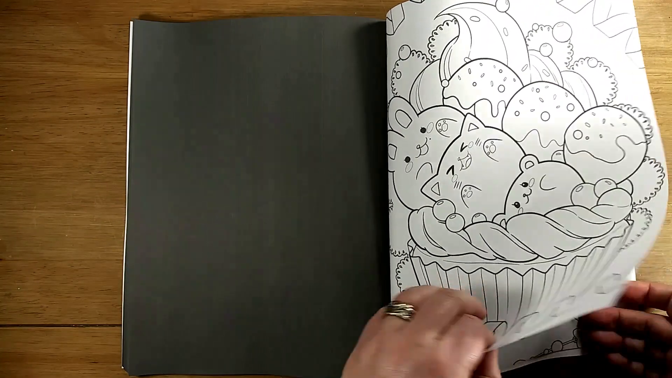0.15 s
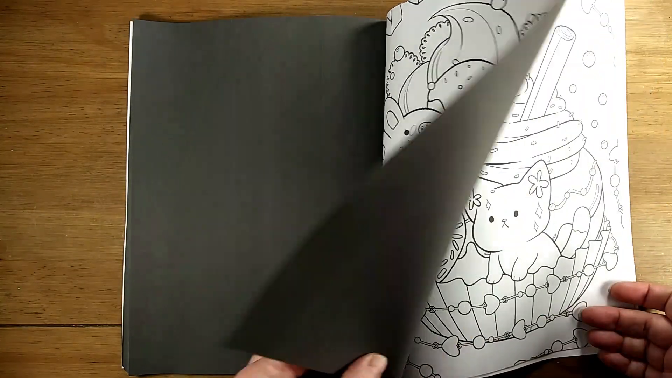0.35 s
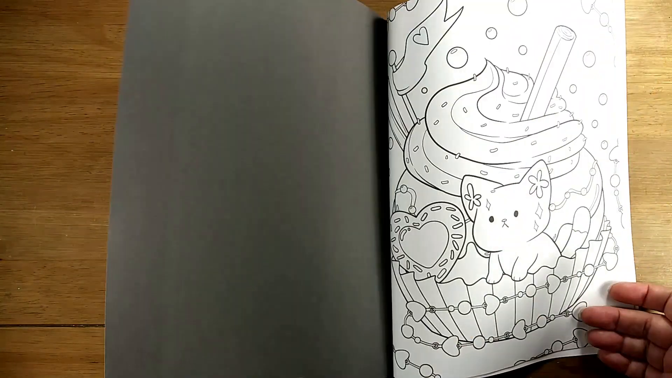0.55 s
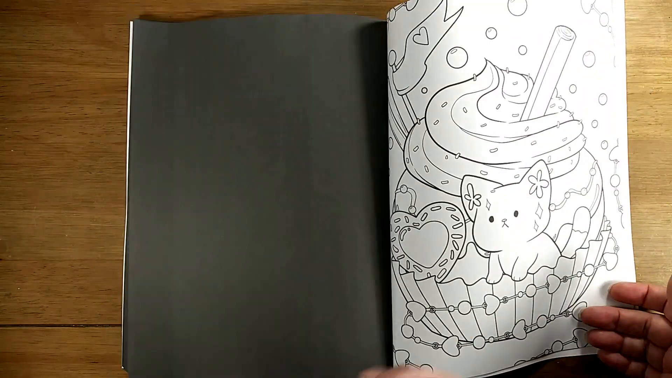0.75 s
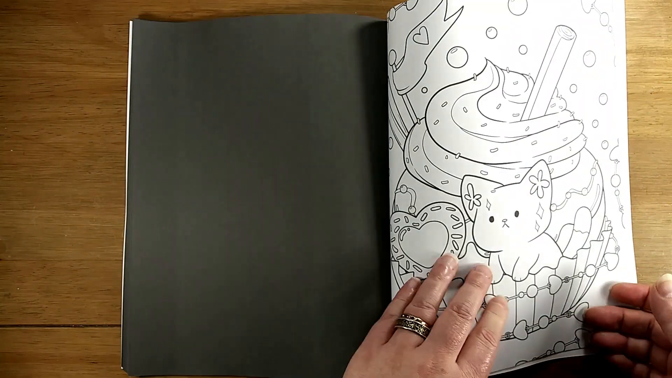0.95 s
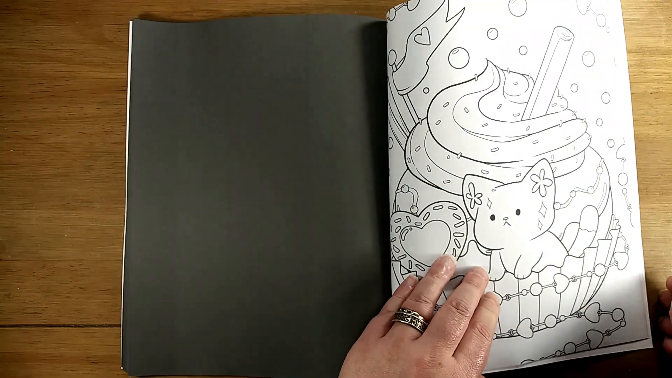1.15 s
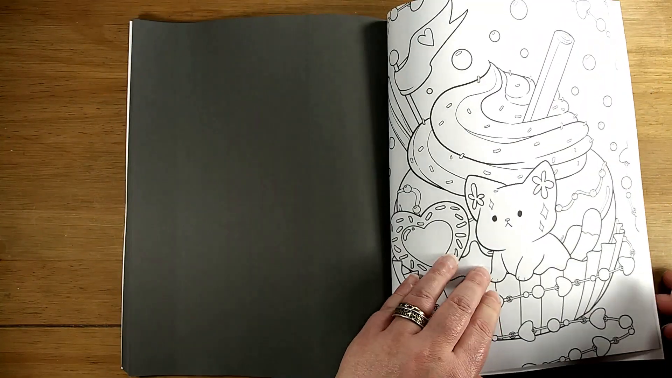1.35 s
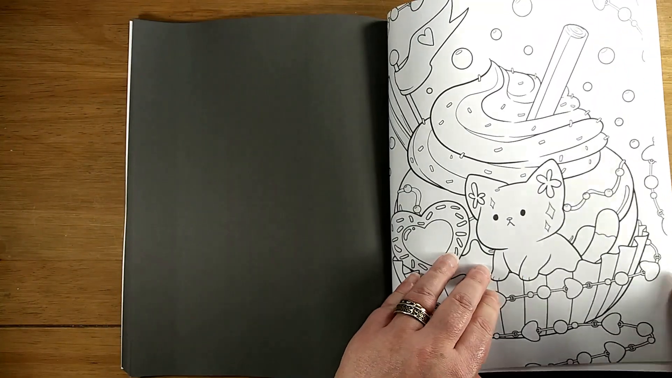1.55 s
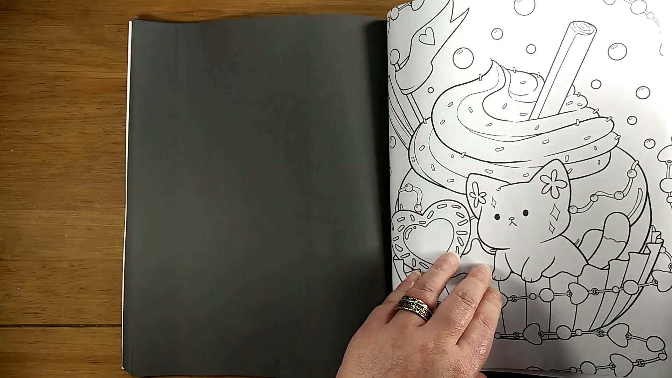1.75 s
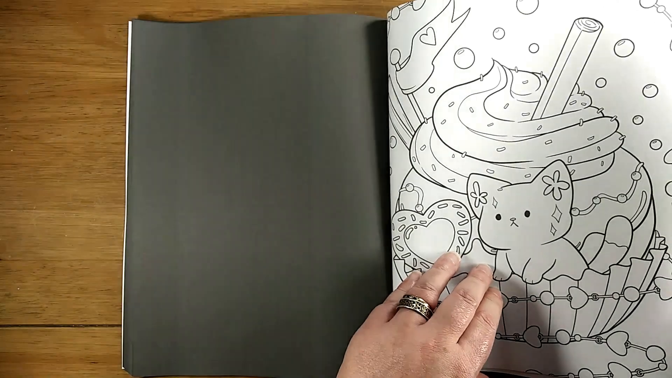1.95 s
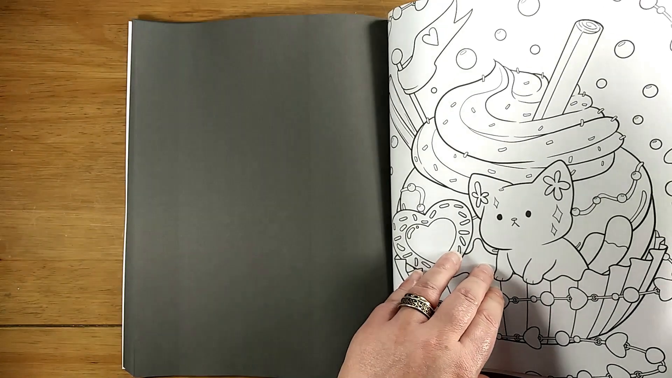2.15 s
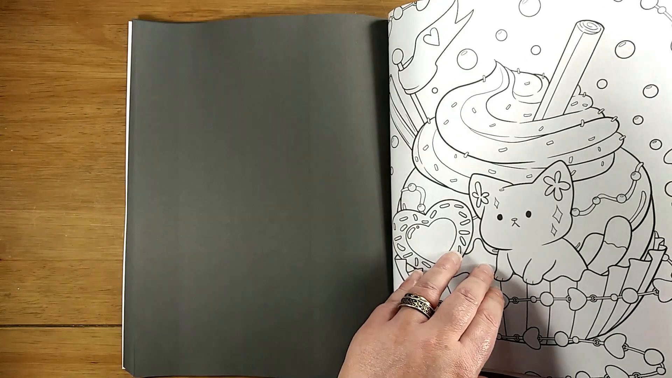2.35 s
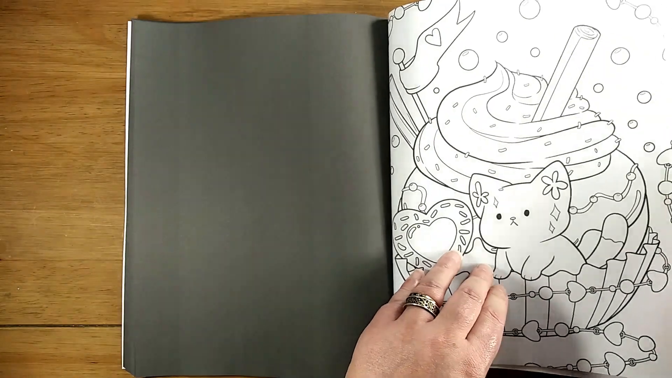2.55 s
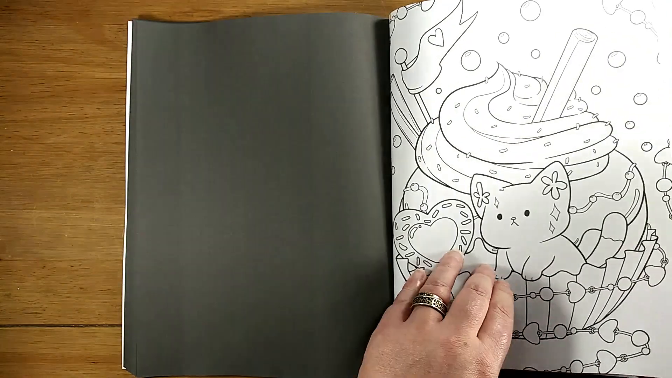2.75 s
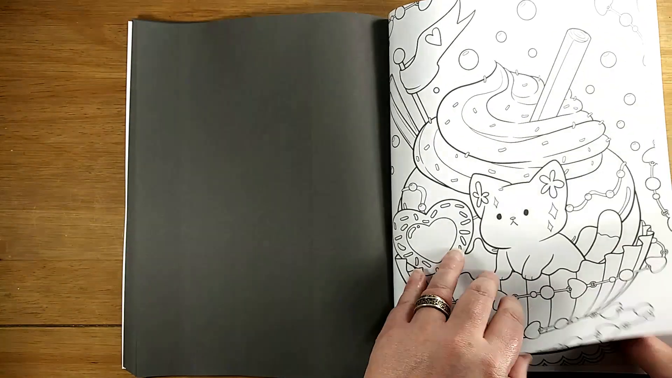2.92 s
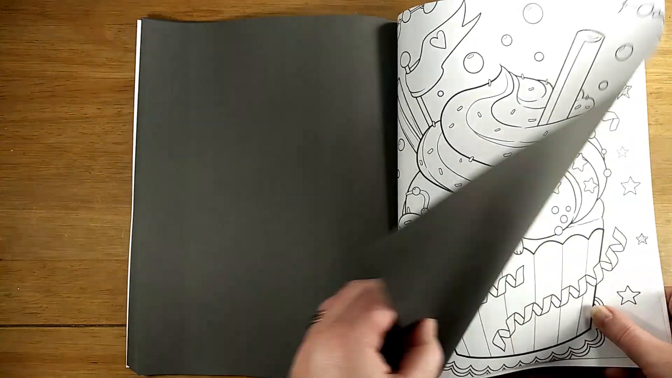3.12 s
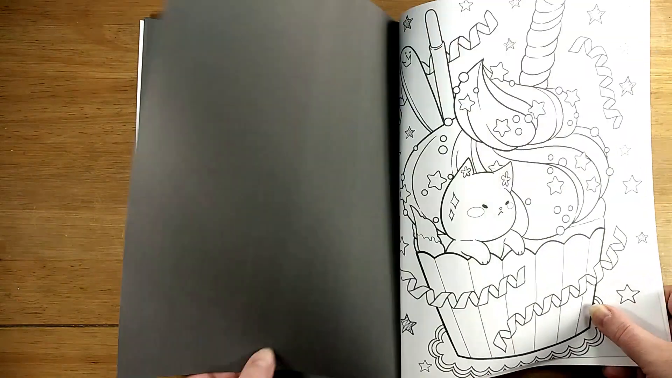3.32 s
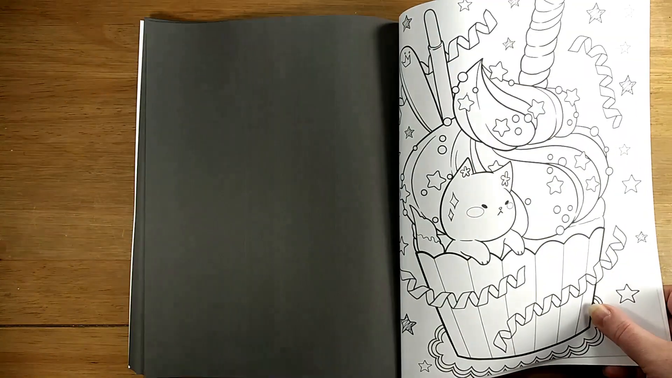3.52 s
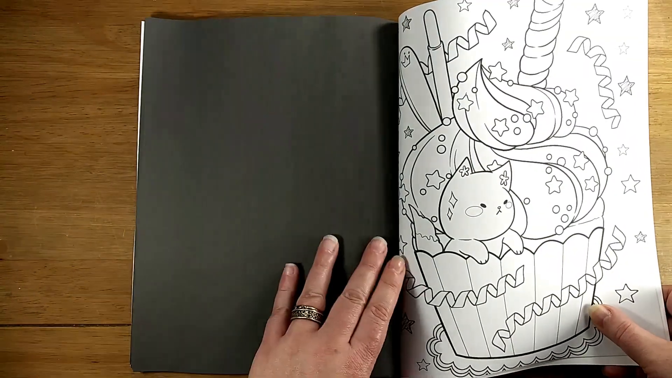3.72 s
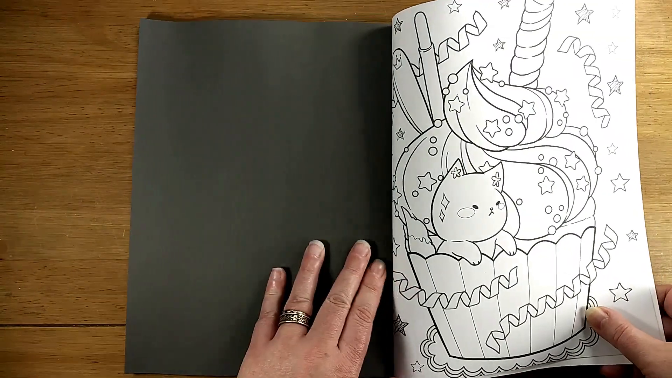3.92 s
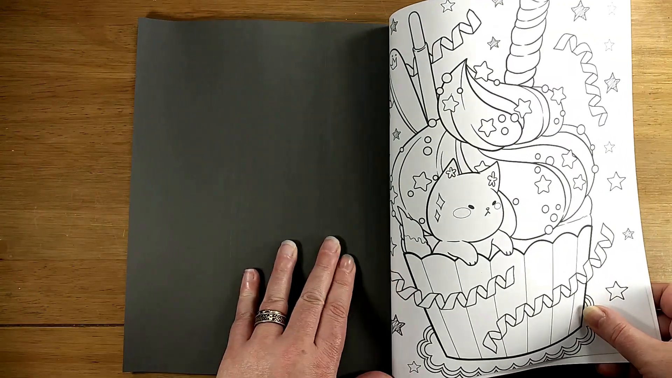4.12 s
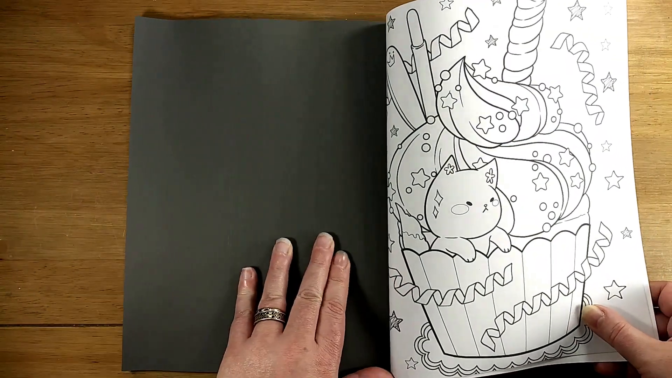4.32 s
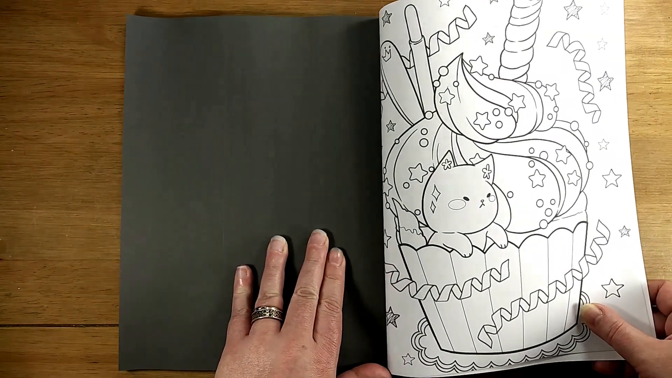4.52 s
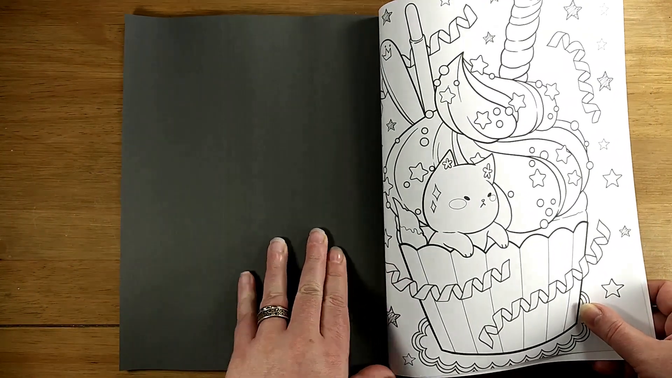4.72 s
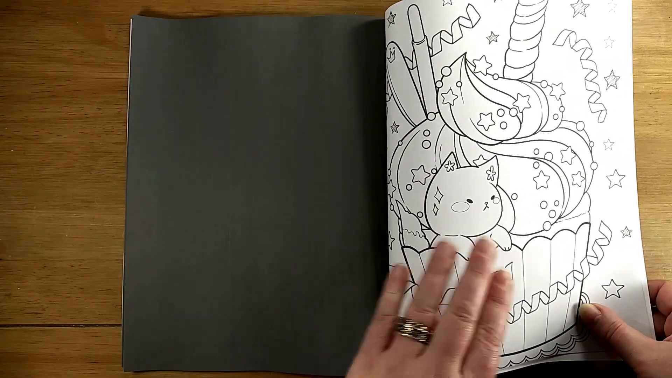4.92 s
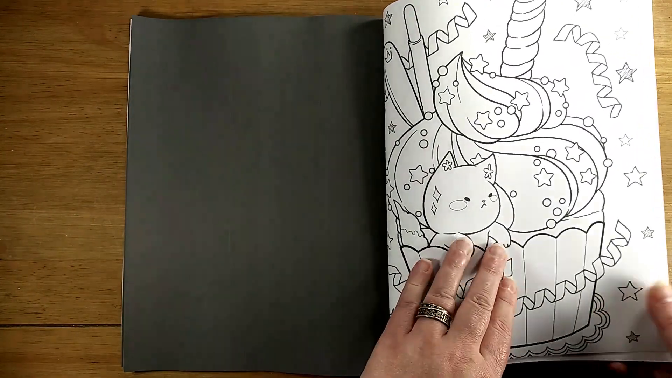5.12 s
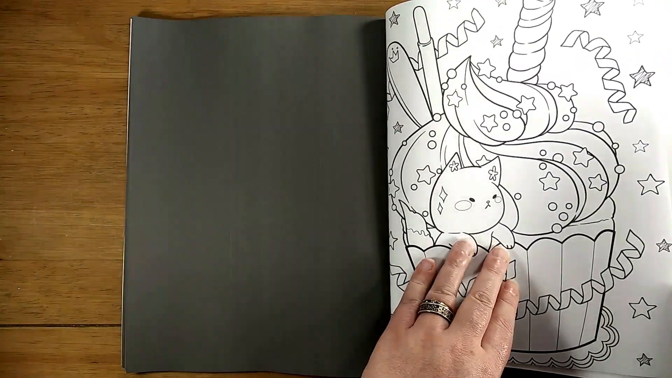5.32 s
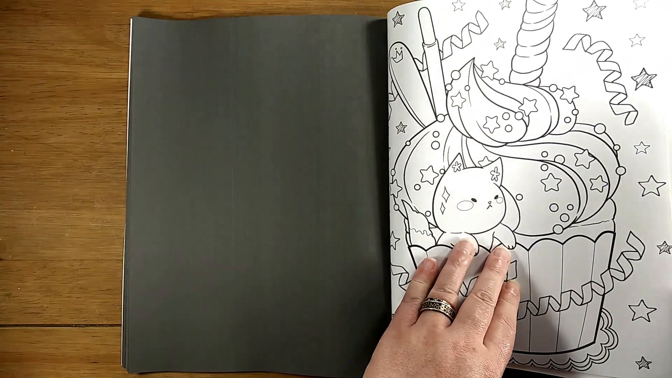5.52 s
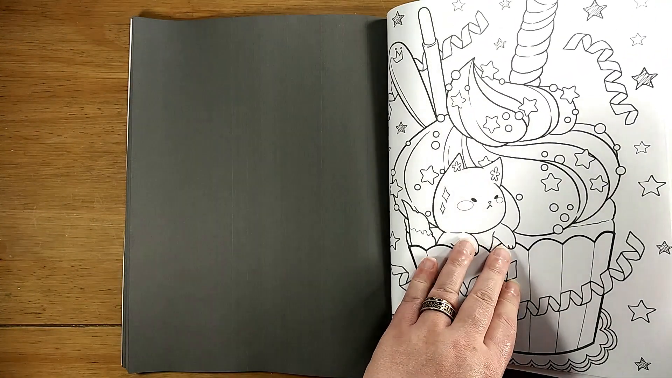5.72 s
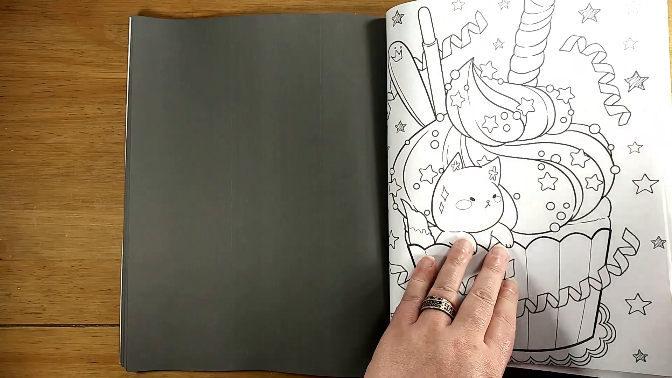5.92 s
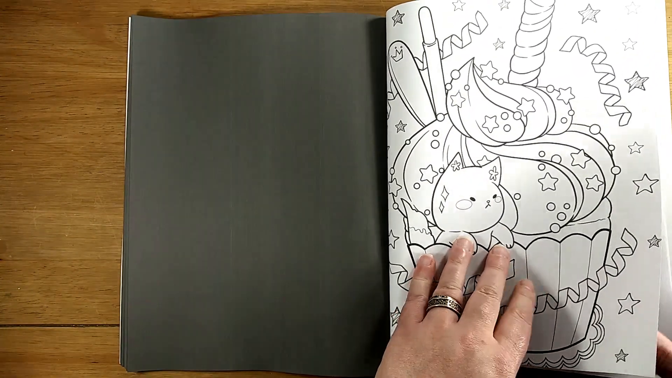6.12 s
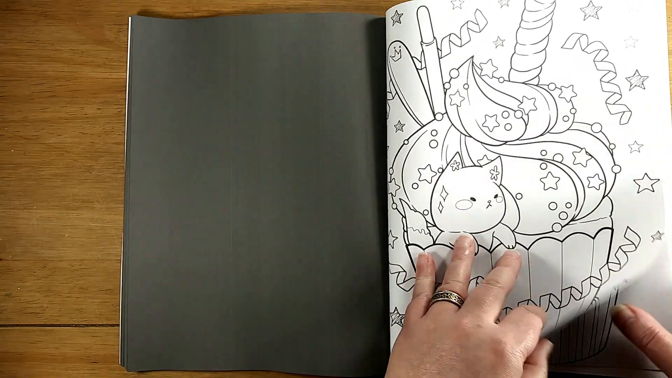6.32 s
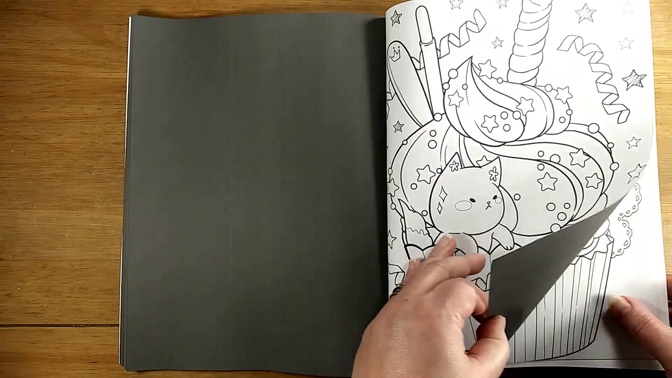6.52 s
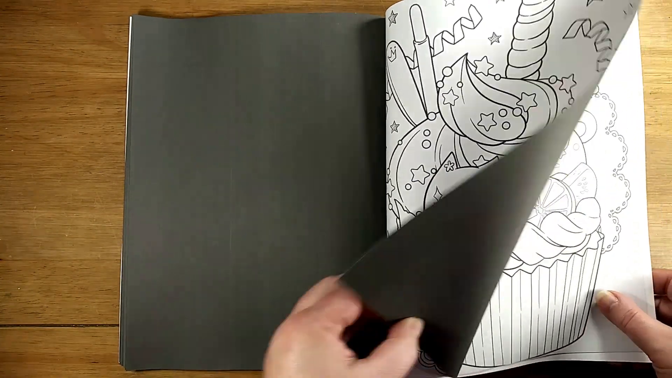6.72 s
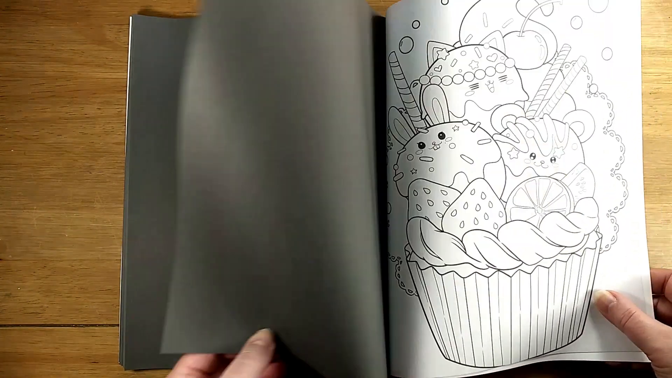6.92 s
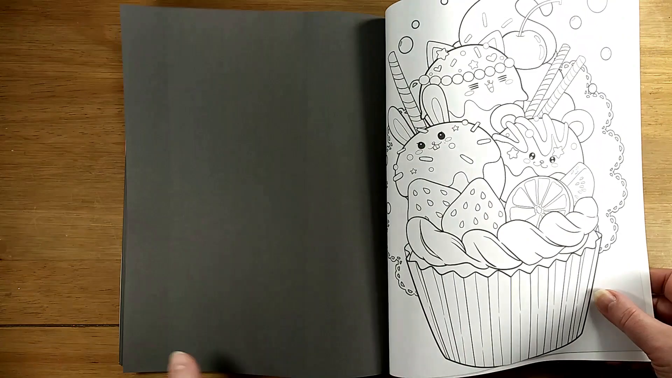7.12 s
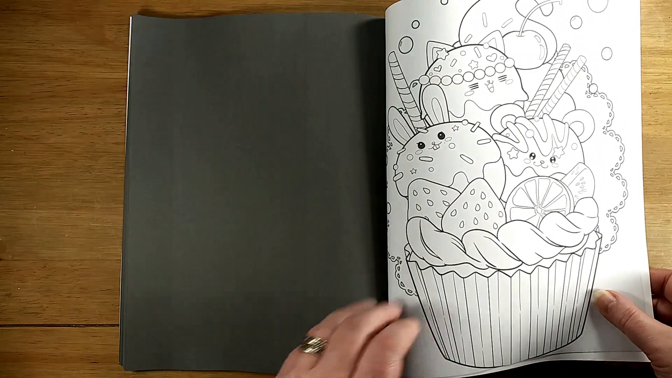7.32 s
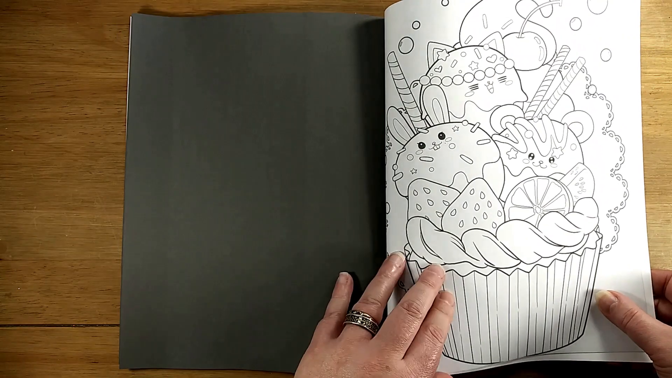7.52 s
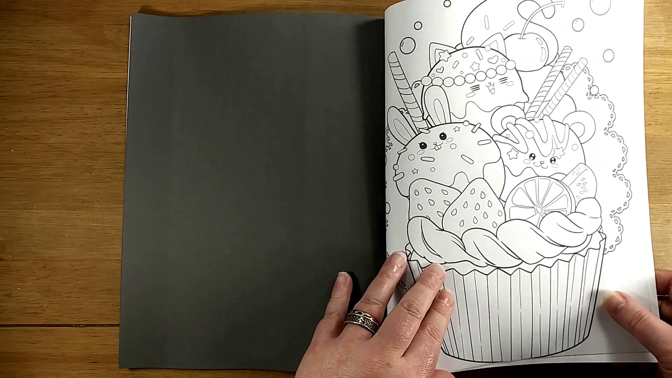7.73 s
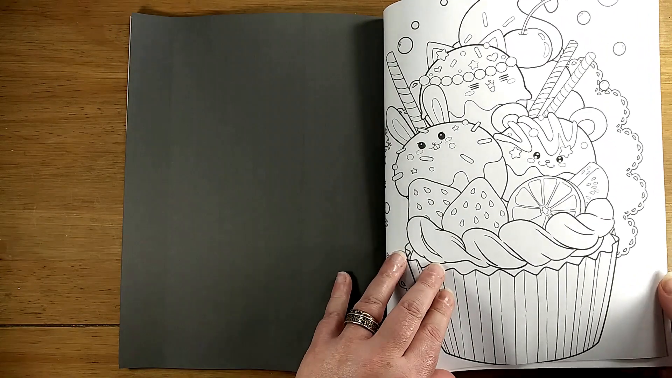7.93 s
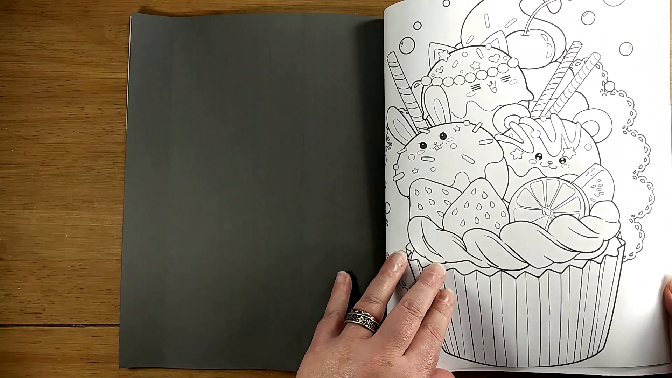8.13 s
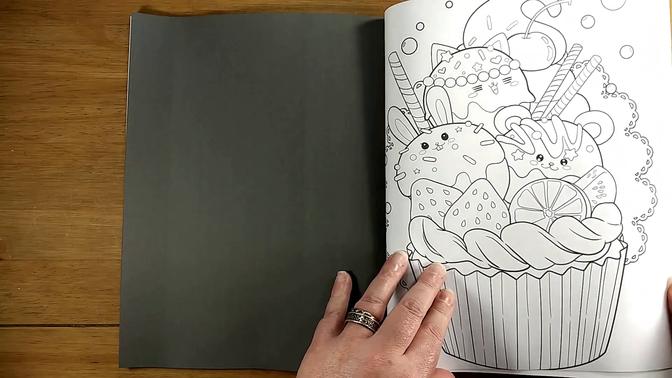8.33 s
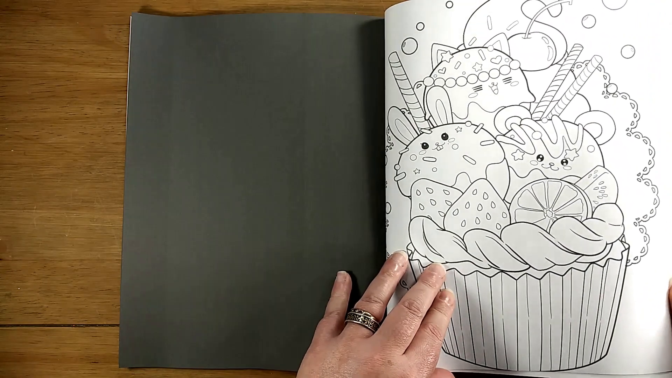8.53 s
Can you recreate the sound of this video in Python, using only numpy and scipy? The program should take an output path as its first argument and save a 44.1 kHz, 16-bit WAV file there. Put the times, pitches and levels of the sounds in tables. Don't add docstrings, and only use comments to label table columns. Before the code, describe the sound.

Close papery scrapes and flaps as a hand turns book pages on a table, sparse finger taps and crease clicks in a quiet room.

```python
import sys
import numpy as np
from scipy import signal
from scipy.fft import rfft, irfft, next_fast_len
from scipy.io import wavfile
from scipy.ndimage import uniform_filter1d

SR = 44100
rng = np.random.default_rng(int(sys.argv[2]) if len(sys.argv) > 2 else 0)


def volts(x):
    e = np.asarray(x, float) / 20
    return 10 ** e


def int16_out(signal):
    q = np.round(np.clip(np.atleast_2d(signal).T, -1, 1) * 32767)
    wavfile.write(sys.argv[1], SR, q.astype(np.int16))


N = 381906


def evened(x):
    return x / np.sqrt(np.mean(x ** 2) + 1e-20)


def colour(x, points):
    f, db = np.transpose(points)
    size = next_fast_len(len(x))
    hz = np.fft.rfftfreq(size, 1 / SR)
    gain = volts(np.interp(np.log(hz + 1), np.log(f + 1), db))
    return irfft(rfft(x, size) * gain, size)[:len(x)]


def resonate(x, hz, width):
    turn = np.exp(2j * np.pi * np.cumsum(hz * np.ones(len(x))) / SR)
    r = np.exp(-np.pi * width / SR)
    smooth = signal.lfilter([1 - r], [1, -r], x / turn + 1e-18)
    return 2 * (turn * smooth).real


def resonate_twice(x, hz, width, second_width):
    return resonate(resonate(x, hz, width), hz, second_width)


def swells(rows, weight=1):
    edge_db = -20
    rise_round, fall_round = 1.34, 1.46
    power = np.zeros(N)
    for (s, rise, fall, db, *_), w in zip(rows, weight * np.ones(len(rows))):
        start = max(round((s - 3 * rise) * SR), 0)
        stop = min(round((s + 3 * fall) * SR), N)
        at = np.arange(start, stop)
        late = at / SR - s
        bend = np.where(late < 0, abs(late / rise) ** rise_round, abs(late / fall) ** fall_round)
        power[at] += w * volts(2 * (db + edge_db * bend))
    return power


def slips(per_s, spread_db, clump_db, clump_s):
    size = volts(spread_db * np.minimum(rng.exponential(1, N), 5)) * rng.standard_normal(N)
    clump = evened(uniform_filter1d(rng.standard_normal(N), max(int(clump_s * SR), 2)))
    happens = rng.random(N) < per_s / SR
    return evened(size * happens * volts(clump_db * clump))


def patchy(x, depth_db, frames, bins):
    z = signal.stft(x, nperseg=256, noverlap=192)[2]
    field = uniform_filter1d(uniform_filter1d(rng.standard_normal(z.shape), bins, 0), frames, 1)
    return evened(signal.istft(z * volts(depth_db * evened(field)), nperseg=256, noverlap=192)[1][:N])


def paper():
    # (frequency [Hz], level [dB per Hz])
    scrape_spectrum = [(600, -38), (1200, -18), (2000, -0.5), (3200, -0.5), (5000, 3.5), (6500, -8),
                       (7800, -25), (9500, -18), (16000, -62)]
    # (frequency [Hz], level [dB per Hz])
    fizz_spectrum = [(4120, -7.5), (7000, -4.5), (7770, -11.5), (8760, -8.5), (10700, -6.5), (15100, -16),
                     (16000, -35)]
    (scrape, flex, fizz), gap_hz = movements()
    fine = patchy(slips(per_s=14000, spread_db=1.2, clump_db=1.0, clump_s=.006), 1.7, 24, 3)
    coarse = slips(per_s=6000, spread_db=1.7, clump_db=1.5, clump_s=.008)
    surface = evened(colour(fine, scrape_spectrum))
    gap = evened(resonate_twice(fine, gap_hz, 1950, 2500))
    rub = evened(0.73 * surface + 0.6 * gap)
    brush = evened(colour(fine, fizz_spectrum))
    return scrape * rub + flex * lifted_sheet(coarse) + fizz * brush + pockets(fine)


def movements():
    # (peak time [s], rise [s], fall [s], level [dB], pitch of the air gap under the sheet [Hz])
    first_page = [(0, .01, .03, -54, 2600), (.128, 0.092, 0.049, -47, 2450), (.2, 0.057, 0.11, -50, 2830),
                  (.25, 0.076, 0.13, -47, 3200), (.32, 0.15, 0.12, -46.5, 2770),
                  (.39, 0.09, 0.2, -43, 2980), (.44, 0.11, .1, -46, 3600), (.49, 0.12, 0.071, -44.5, 4530),
                  (.54, 0.17, 0.041, -43.5, 4700), (.6, 0.026, 0.044, -60.5, 2200),
                  (.81, 0.04, 0.3, -65, 3370), (1.044, 0.042, 0.096, -51, 4400),
                  (1.576, 0.16, 0.017, -60, 3800), (1.65, 0.039, 0.1, -60, 4300),
                  (1.706, 0.073, 0.017, -55.5, 4340)]
    # (peak time [s], rise [s], fall [s], level [dB], gap pitch [Hz])
    second_page = [(2.582, 0.033, 0.069, -45.5, 4260), (2.61, .04, .03, -50, 4300),
                   (2.66, 0.038, .025, -43.5, 4460), (2.702, 0.038, 0.067, -39.5, 4170),
                   (2.735, .04, 0.039, -43, 4270), (2.78, 0.3, 0.11, -42.5, 3180),
                   (2.839, 0.061, 0.033, -41, 3140), (2.862, 0.054, 0.046, -40.5, 2930),
                   (2.885, .04, 0.032, -38.5, 3150), (2.905, .04, 0.02, -37.5, 3140),
                   (2.94, 0.014, 0.092, -43.5, 3040), (3.04, .1, 0.09, -53.5, 3200),
                   (3.125, 0.056, 0.016, -41, 3650), (3.19, 0.057, 0.042, -51.5, 3700),
                   (3.26, 0.17, 0.091, -60, 3730), (3.335, 0.003, 0.043, -31, 3400),
                   (3.352, 0.032, 0.032, -36, 4300), (3.39, 0.077, 0.022, -41.5, 4500),
                   (3.614, 0.016, 0.051, -58, 4270), (3.715, 0.0045, 0.023, -48, 4600),
                   (3.737, 0.016, 0.041, -40, 5020), (3.815, 0.026, 0.044, -50, 5250),
                   (3.843, .05, 0.015, -55, 5020), (3.98, 0.033, .03, -58, 4000),
                   (4.02, 0.02, 0.35, -55.5, 3740), (4.135, 0.2, 0.012, -52.5, 3280),
                   (4.362, 0.09, 0.24, -71.5, 3420)]
    # (peak time [s], rise [s], fall [s], level [dB], gap pitch [Hz])
    fumbles = [(4.71, 0.037, 0.24, -69, 3500), (5.075, 0.031, .04, -60, 4540),
               (5.113, 0.019, 0.011, -56.5, 4930), (5.2, 0.14, 0.083, -59.5, 4600),
               (5.4, 0.42, 0.2, -70, 3270)]
    # (peak time [s], rise [s], fall [s], level [dB], gap pitch [Hz])
    third_page = [(5.918, 0.016, 0.19, -51.5, 4340), (5.98, 0.14, 0.056, -52.5, 4500),
                  (6.043, 0.025, 0.056, -41, 3880), (6.06, .03, .07, -43.5, 4480),
                  (6.08, .05, .05, -57, 4170), (6.12, 0.067, 0.044, -45, 3500),
                  (6.175, 0.17, 0.057, -46.5, 4100), (6.24, 0.11, .1, -56.5, 4180),
                  (6.319, 0.044, 0.0062, -34, 3160), (6.346, 0.02, 0.028, -38, 4300),
                  (6.4, .05, .08, -60, 4100), (6.452, 0.03, 0.023, -42.5, 4030),
                  (6.507, 0.008, 0.079, -43.5, 4020), (6.565, 0.11, 0.033, -43.5, 4030),
                  (6.64, 0.038, .06, -40, 3720), (6.695, 0.055, 0.033, -35.5, 4320),
                  (6.773, 0.014, 0.019, -42.5, 3440), (6.808, 0.067, 0.025, -47, 3380),
                  (6.914, 0.075, 0.14, -50, 3940), (6.95, 0.056, 0.11, -47.5, 4150),
                  (7.03, 0.11, 0.13, -46, 3970), (7.1, 0.1, 0.02, -41, 4360),
                  (7.458, 0.0054, 0.14, -59, 4570), (7.8, .06, 0.11, -72, 3140),
                  (7.924, 0.022, 0.18, -68, 3800), (8.172, .022, 0.045, -56, 4160)]
    # (peak time [s], rise [s], fall [s], level [dB])
    brushes = [(.135, 0.2, 0.1, -56.5), (.236, 0.091, 0.15, -54), (.41, 0.092, .1, -61),
               (.5, 0.17, 0.061, -46), (.546, 0.088, 0.032, -45), (.8, 0.018, 0.017, -62.5),
               (1.0, 0.016, 0.045, -56), (1.045, 0.025, 0.068, -51.5), (1.1, 0.069, .045, -53),
               (2.586, 0.025, 0.11, -49.5), (2.69, .1, .07, -58), (2.9, 0.021, 0.025, -45),
               (2.94, 0.013, 0.083, -48.5), (3.11, 0.11, 0.051, -50), (3.19, 0.04, 0.037, -52.5),
               (3.26, 0.069, 0.065, -59.5), (3.336, .004, 0.068, -35.5), (3.742, 0.024, 0.0095, -40),
               (3.834, 0.068, 0.017, -59), (3.928, 0.026, 0.017, -60), (3.98, 0.046, 0.054, -58),
               (4.03, 0.044, 0.096, -48.5), (4.135, 0.3, 0.011, -54), (4.362, 0.055, .04, -64),
               (4.78, 0.13, 0.1, -63), (5.068, 0.0094, 0.02, -50.5), (5.113, .02, 0.022, -60),
                     (5.2, 0.028, 0.033, -65), (6.044, 0.021, 0.07, -58), (6.318, 0.017, 0.0079, -52),
                     (6.346, .012, 0.033, -51.5), (6.453, 0.083, .025, -53.5), (6.515, 0.017, 0.065, -46),
                     (6.56, 0.088, 0.057, -47.5), (6.693, 0.09, 0.031, -40.5), (6.947, 0.04, 0.042, -44.5),
                     (7.032, 0.066, 0.086, -43.5), (7.46, 0.0091, 0.13, -65), (7.796, .03, 0.043, -59)]
    # (peak time [s], rise [s], fall [s], level [dB])
    bends = [(0, .01, 0.021, -36.5), (.075, 0.043, 0.045, -53), (.131, .006, 0.026, -46),
             (.236, 0.11, 0.17, -51.5), (.344, 0.18, 0.079, -50.5), (.546, 0.026, .05, -47),
             (.58, 0.013, 0.034, -39.5), (.605, 0.02, 0.072, -43.5), (.64, .05, 0.094, -63),
             (1.05, 0.037, 0.13, -53.5), (1.44, .01, 0.048, -60.5), (2.522, .008, 0.044, -51.5),
             (2.57, 0.032, 0.21, -51), (2.706, 0.0041, 0.031, -42), (2.68, 0.057, 0.03, -54),
             (2.86, 0.21, 0.043, -49.5), (2.925, 0.015, 0.049, -45.5), (3.06, 0.089, .1, -55),
             (3.125, 0.087, 0.018, -39.5), (3.19, .06, 0.18, -56.5), (3.334, 0.00067, 0.029, -28.5),
             (3.35, 0.03, 0.073, -38), (3.41, .05, 0.025, -52), (3.724, 0.007, 0.036, -36.5),
             (3.835, .14, 0.027, -49), (3.928, 0.031, 0.032, -50.5), (3.975, .012, 0.036, -63),
             (4.008, 0.0048, .2, -45.5), (4.125, 0.22, 0.031, -47.5), (4.28, .2, 0.019, -60.5),
             (4.41, 0.22, 0.038, -63),
             (4.52, 0.03, .04, -62), (4.796, 0.048, 0.11, -64), (4.88, 0.066, .06, -61.5),
                   (5.069, 0.0064, 0.027, -48), (5.205, 0.073, 0.04, -56.5), (5.924, 0.054, 0.18, -55),
                   (6.043, 0.023, .05, -45.5), (6.1, 0.054, 0.19, -55), (6.329, 0.086, 0.012, -48),
                   (6.52, 0.072, 0.14, -38.5), (6.562, 0.086, 0.023, -34.5), (6.645, 0.044, 0.066, -34),
                   (6.7, 0.13, 0.021, -31.5), (6.769, 0.0066, 0.044, -41.5), (6.9, 0.076, 0.21, -53),
                   (7.1, .3, .05, -57), (7.5, 0.047, 0.0078, -55.5), (7.518, 0.004, 0.0059, -41.5),
                   (7.924, 0.027, 0.092, -67), (8.172, 0.026, 0.062, -66)]
    slides = first_page + second_page + fumbles + third_page
    rest_hz, rest = 3500, 1e-11
    scrape = swells(slides)
    hz = (swells(slides, np.transpose(slides)[-1]) + rest * rest_hz) / (scrape + rest)
    octaves = np.log2(hz / rest_hz)
    flex = swells(bends) + scrape * volts(2 * (-26.5 - 39 * octaves))
    fizz = swells(brushes) + scrape * volts(2 * (-26.5 + 45.5 * octaves))
    return np.sqrt([scrape, flex, fizz]), uniform_filter1d(hz, size=400)


def lifted_sheet(coarse):
    # (frequency [Hz], width [Hz], level [dB])
    sheet_modes = [(630, 123, -11), (772, 15, 15.5), (840, 390, -1), (1178, 9.7, 20), (1640, 160, 14)]
    # (time [s], pitch [Hz])
    curl_curves = [
        [(0.0, 1600), (0.128, 1240), (0.27, 1500), (0.498, 1440), (0.556, 980), (0.7, 664)],
        [(0.95, 643), (1.074, 830), (1.322, 643), (1.412, 1240), (1.572, 1140), (1.6, 774)],
        [(2.5, 932), (2.752, 786), (2.83, 1380), (3.018, 740), (3.196, 1460), (3.25, 896)],
        [(3.3, 864), (3.424, 990), (3.53, 587), (3.658, 782), (3.68, 1200), (4.3, 915)],
        [(4.7, 1170), (4.782, 662), (4.836, 1300), (4.884, 521), (5.174, 912), (5.3, 629)],
        [(5.9, 1220), (6.202, 1030), (6.242, 873), (6.294, 1380), (6.334, 1280), (6.44, 1380)],
        [(6.45, 850), (6.632, 1060), (6.662, 970), (6.732, 1390), (6.756, 1030), (6.85, 1050)],
        [(6.87, 1420), (6.926, 1300), (7.122, 1500), (7.154, 746), (7.574, 630), (7.6, 673)],
    ]
    modes = np.zeros(N)
    for k, (hz, width, db) in enumerate(sheet_modes):
        modes += (-1) ** k * volts(db) * resonate(coarse, hz, width)
    rumble = colour(coarse, [(150, -27), (350, -5.5), (600, -2.5), (1000, 0), (1600, -1.5),
                             (3000, -20), (6000, -69)])
    curl_hz = np.interp(np.arange(N) / SR, *np.concatenate(curl_curves).T)
    curl = resonate_twice(coarse, curl_hz, 980, 1340)
    return evened(0.25 * evened(modes) + 0.7 * evened(rumble) + 0.78 * evened(curl))


def pockets(slipping):
    # (peak time [s], rise [s], fall [s], level [dB], pitch [Hz])
    pocket_events = [(.1, .07, .05, -58, 4800), (.235, .05, .06, -55, 5370), (.33, 0.083, 0.037, -56, 2100),
                     (.39, 0.054, .05, -54, 3100), (.52, .08, 0.038, -55, 5140),
                     (2.84, 0.047, .03, -44, 3300), (2.875, .04, 0.031, -34, 2980),
                     (3.345, 0.011, 0.022, -36.5, 2300), (3.728, 0.0065, .02, -39.5, 2030),
                     (3.739, .015, .015, -47, 4950), (4.835, .008, 0.0099, -51, 1650),
                     (5.212, .002, 0.0072, -46, 4500), (6.31, 0.023, .015, -49, 2400),
                     (6.515, 0.013, .04, -46, 3870), (6.69, .04, 0.028, -40, 2970),
                     (6.948, 0.027, .035, -47, 10500), (6.97, .06, 0.066, -52, 4070),
                     (7.075, .06, .04, -55, 4570), (7.81, .02, .03, -64, 4500)]
    sharpness = 3.4
    out = np.zeros(N)
    for row in pocket_events:
        s, hz = row[0], row[-1]
        near = slice(max(round((s - .3) * SR), 0), round((s + .3) * SR))
        band = resonate_twice(slipping[near], hz, hz / sharpness, hz / sharpness)
        out[near] += np.sqrt(swells([row])[near]) * evened(band)
    return out


def snaps():
    # (time [s], crack level [dB], thud against crack [dB], thud pitch [Hz], decay time T60 [s])
    buckles = [(0.0014, -32.5, -14, 1225, 0.062), (0.1296, -35.5, 0.5, 1340, 0.028),
               (0.5792, -51.5, 22.5, 850, 0.013), (0.6027, -53.5, 19, 900, 0.024),
               (1.2544, -25, -4, 640, 0.0075), (1.4331, -22.5, -17, 1330, 0.013),
               (1.436, -43, 15.5, 1260, 0.0096), (1.4399, -50.5, 13, 780, .01),
               (1.4456, -51, 12, 720, .008), (2.7001, -46, 26.5, 713, 0.016), (2.7113, -54, 11, 620, 0.012),
               (3.0285, -48.5, 18.5, 784, 0.023), (3.0865, -40, 10, 1150, 0.014),
               (3.3325, -10, -9, 910, 0.022), (3.3351, -28, 6.5, 416, 0.019),
               (3.7242, -26, -12, 1010, 0.016), (3.7238, -40, 12.5, 1560, 0.012),
               (3.9247, -28, -8.5, 1430, 0.013), (3.9696, -51, 8.5, 805, 0.049),
               (5.0685, -35.5, -6.5, 563, 0.023), (5.2115, -33, -10, 580, 0.0077),
               (5.076, -44, 8, 616, 0.015), (4.006, -40, -2, 990, .015), (6.473, -56, 18.5, 700, 0.061),
               (6.492, -59, 15, 850, 0.025), (6.5063, -35.5, 4, 960, 0.019), (6.531, -45, 14, 830, 0.016),
               (6.549, -44, 18, 1040, 0.019), (6.613, -47, 16, 1090, .015), (6.646, -43, 14, 1150, 0.022),
               (6.6576, -39.5, 20, 750, 0.026), (6.769, -33.5, 0, 1000, 0.0086),
               (6.774, -39.5, 8.5, 850, 0.01), (6.779, -42, 7, 850, 0.011), (7.5137, -31, 2.5, 630, 0.017)]
    # (time [s], level [dB])
    finger_taps = [(0.9956, -39.5), (1.034, -48), (1.507, -49), (4.206, -44.5), (4.785, -48),
                   (4.835, -44.5), (5.0401, -43.5), (7.49, -43), (7.862, -53), (7.9174, -43.5)]
    # (time [s], level [dB])
    crease_ticks = [(0.0198, -35), (.071, -38), (.11, -36), (.193, -45), (.359, -39), (1.122, -40),
                    (1.411, -44), (1.5272, -41.5), (2.3007, -50), (2.862, -26.5), (2.877, -35),
                    (2.882, -25), (2.936, -37), (4.693, -50), (4.716, -45), (6.0413, -34), (6.388, -33),
                    (6.398, -38), (7.2, -45), (7.455, -46), (7.788, -38), (7.934, -47)]
    tap_thud = (-5.5, 680, 0.042)
    tick_thud = (-24, 1150, 0.03)
    strikes = buckles + [(*row, *tap_thud) for row in finger_taps]
    strikes = strikes + [(*row, *tick_thud) for row in crease_ticks]
    out = np.zeros(N + 4000)
    for s, crack_db, thud_db, hz, t60 in strikes:
        out[round(s * SR):][:4000] += volts(crack_db) * strike(thud_db, hz, t60)
    return out[:N]


def strike(thud_db, hz, t60):
    t = np.arange(4000) / SR
    noise = rng.standard_normal(len(t))
    crack = colour(noise, [(600, -11), (1800, 1.5), (4500, -5.5), (7500, -18.5), (10000, -25.0), (16000, -23)])
    crack = evened(crack) * volts(-6 - 60 * t / (0.83 * t60)) * np.minimum(t / .0003, 1)
    late = np.maximum(t - .0006, 0)
    glide = 1 + 0.11 * np.exp(-late / 0.0017)
    swing = np.zeros(len(t))
    for ratio, db in [(1.023, 0.5), (0.582, -16.5), (1.59, -46.5)]:  # (pitch ratio, level [dB])
        swing += volts(db - 60 * late * ratio / t60) * np.sin(2 * np.pi * ratio * hz * late * glide)
    rattle = 0.36 * evened(resonate(noise, 0.64 * hz, 450))
    rattle = rattle * volts(-45 * late / t60) * np.minimum(late / 0.001, 1)
    push = 0.044 * late / 0.0075 * np.exp(1 - late / 0.012)
    return crack + volts(thud_db) * (swing + rattle + push)


def puffs():
    # (time [s], level [dB], length [s])
    air_puffs = [
        (1.261, -39, 0.00076),
        (1.434, -40, .006),
        (3.333, -42, 0.013),
        (6.655, -27, .012),
        (7.5135, -45, 0.00082),
    ]
    out = np.zeros(N + 8000)
    for s, db, length in air_puffs:
        u = np.arange(8000) / SR / length
        out[round(s * SR):][:8000] += volts(db) * u * (2 - u) * np.exp(-u)
    return out[:N]


def room(x):
    t60 = 0.077
    at = np.arange(100, 9000, 20) + rng.integers(0, 20, 445)
    echoes = np.zeros(9100)
    echoes[at] = rng.choice([-1., 1.], len(at)) * volts(-60 * at / SR / t60)
    return signal.oaconvolve(x, echoes / np.linalg.norm(echoes))[:N]


def hiss():
    # (frequency [Hz], level [dB per Hz])
    hiss_spectrum = [(20, -35), (100, -24), (170, -10.5), (230, -3), (400, -2), (700, -4), (1600, -10),
                     (3400, -13.5), (4800, -17), (5600, -22.5), (8300, -26), (9000, -17.5), (12000, -18.5),
                     (14500, -20.5), (16000, -18)]
    drift = evened(uniform_filter1d(rng.standard_normal(N), size=6000))
    return volts(-66 + 0.11 * drift) * evened(colour(rng.standard_normal(N), hiss_spectrum))


def scene():
    # (frequency [Hz], level [dB])
    bass_cut = [(20, -44), (100, -27), (200, -11), (320, -3), (16000, -3.5)]
    book = paper() + snaps() + puffs()
    echoed = book + volts(-11) * room(book)
    return (colour(echoed, bass_cut) + hiss())[None]


def roll_off(x):
    return signal.sosfilt(signal.butter(12, 16500, fs=SR, output="sos"), x)


def record(dry):
    low_pass = signal.firwin(801, 15870, window=("kaiser", 9), fs=SR)
    limited = signal.oaconvolve(dry, low_pass[None], "same")
    return roll_off(limited)


dry = scene()
out = record(dry)
int16_out(out)
```